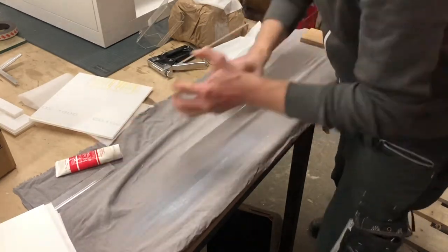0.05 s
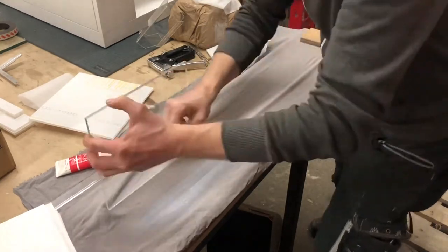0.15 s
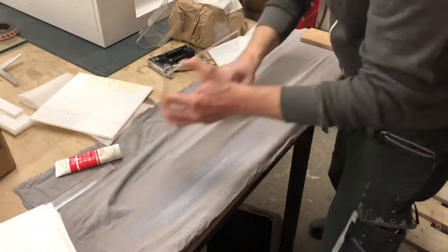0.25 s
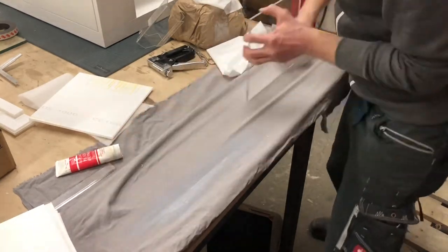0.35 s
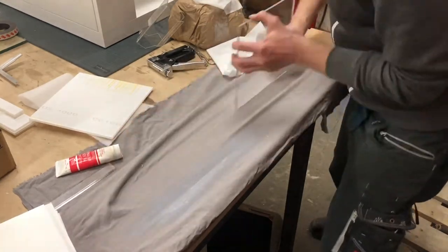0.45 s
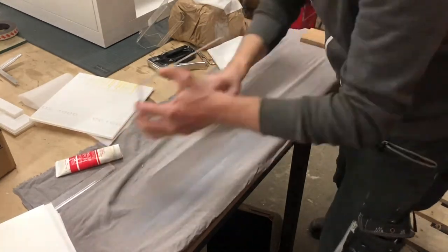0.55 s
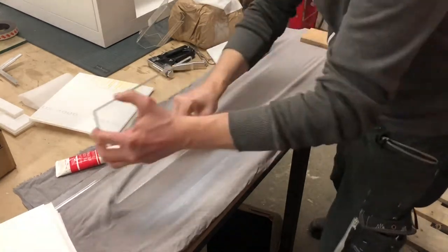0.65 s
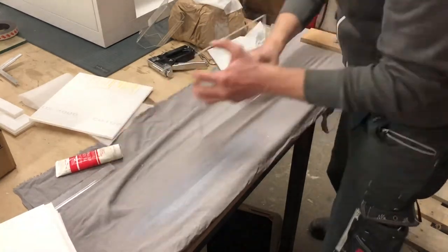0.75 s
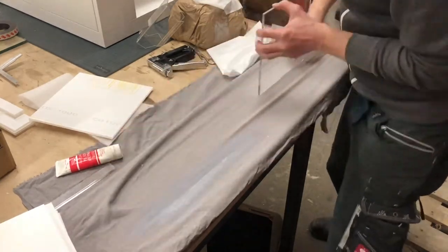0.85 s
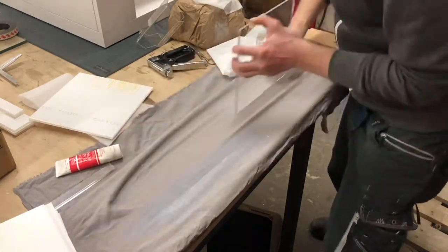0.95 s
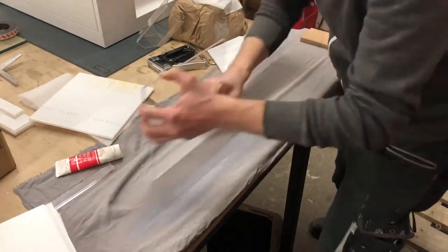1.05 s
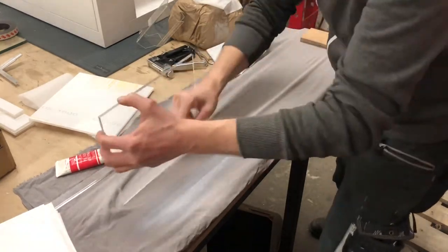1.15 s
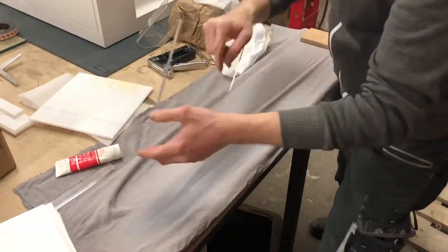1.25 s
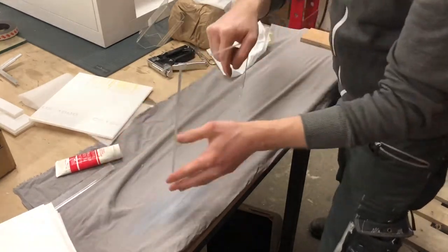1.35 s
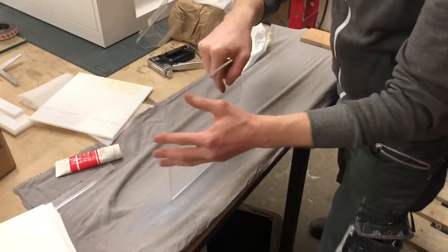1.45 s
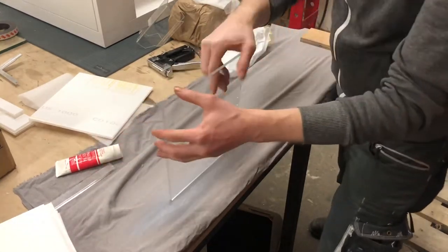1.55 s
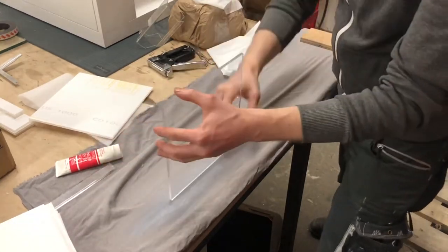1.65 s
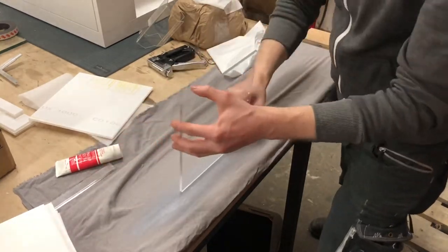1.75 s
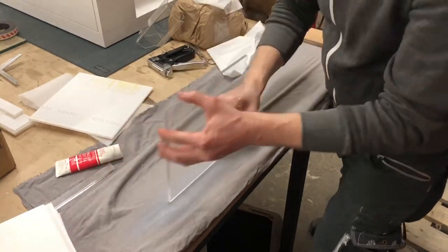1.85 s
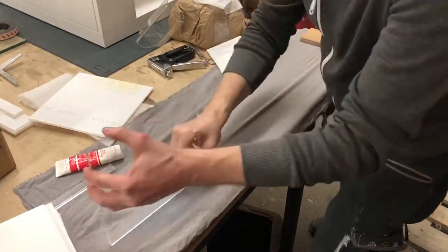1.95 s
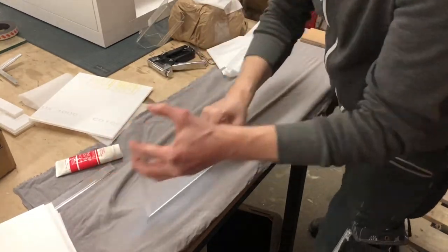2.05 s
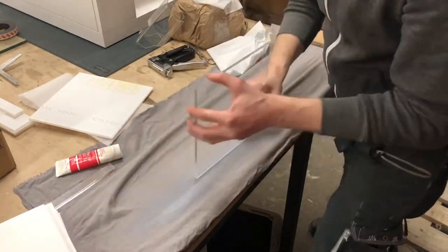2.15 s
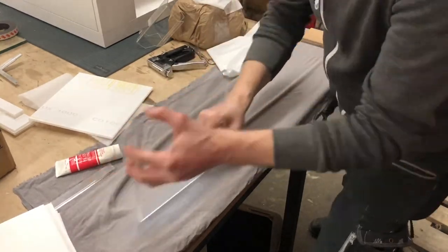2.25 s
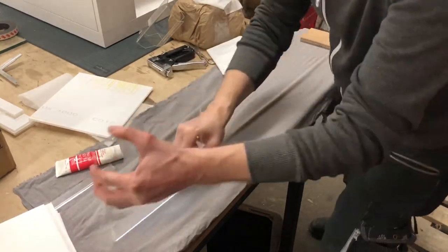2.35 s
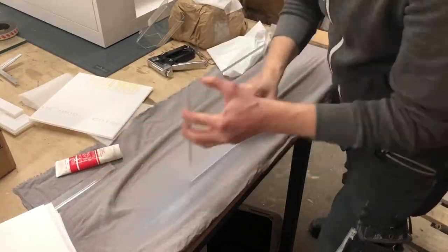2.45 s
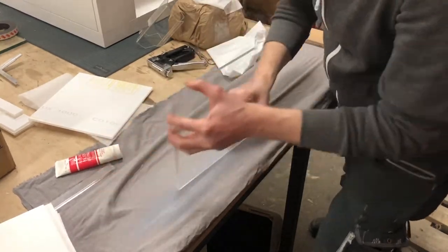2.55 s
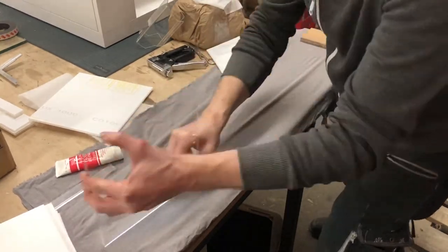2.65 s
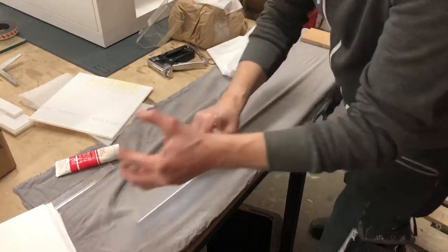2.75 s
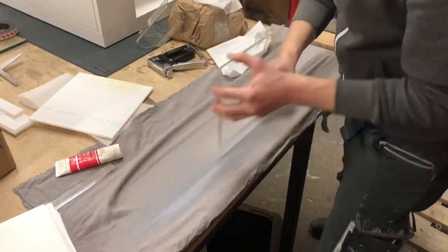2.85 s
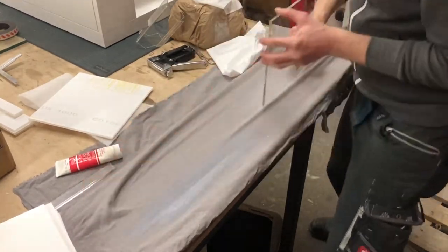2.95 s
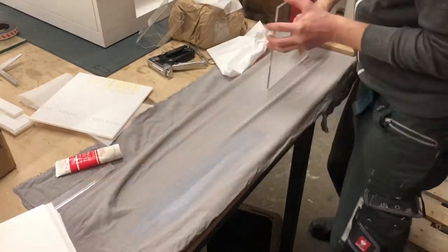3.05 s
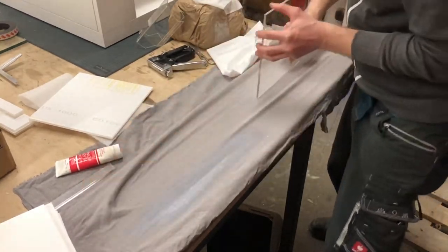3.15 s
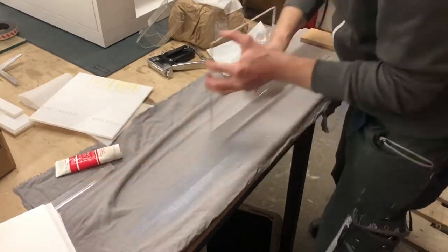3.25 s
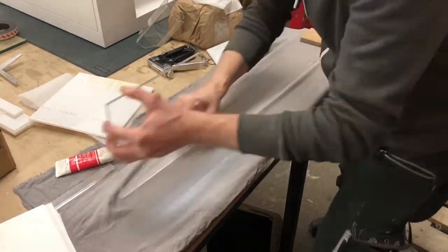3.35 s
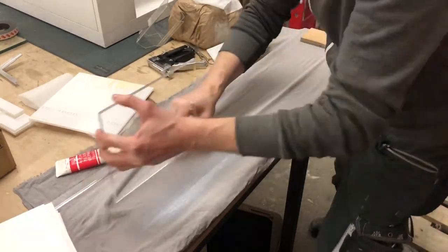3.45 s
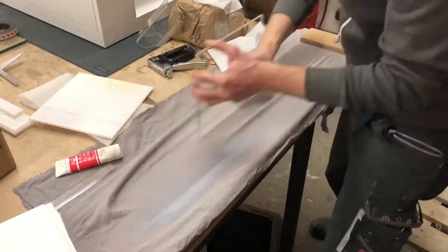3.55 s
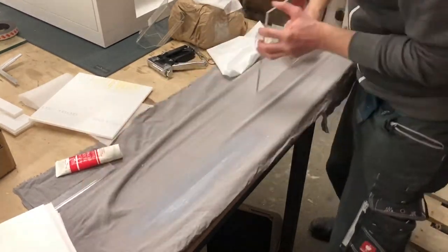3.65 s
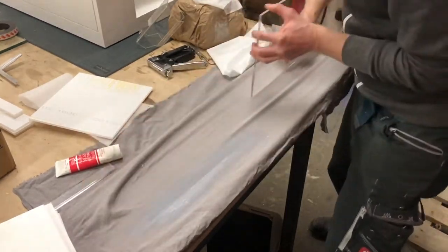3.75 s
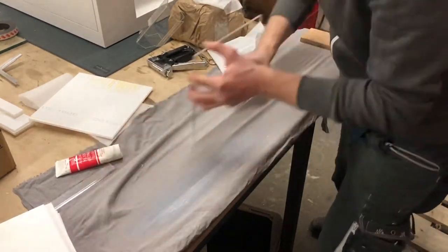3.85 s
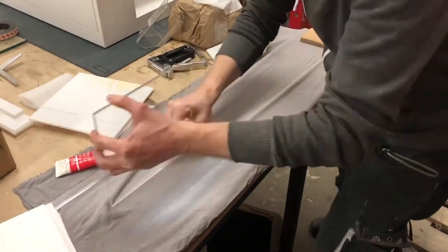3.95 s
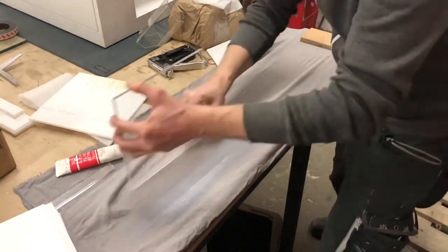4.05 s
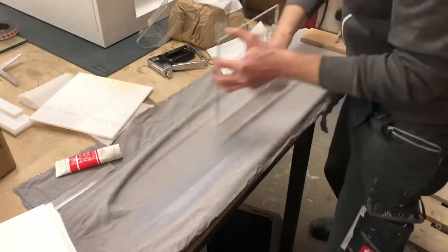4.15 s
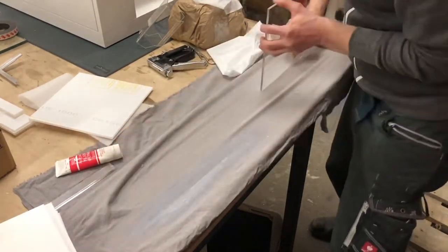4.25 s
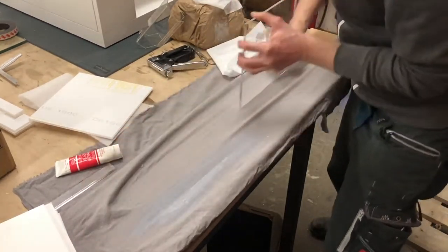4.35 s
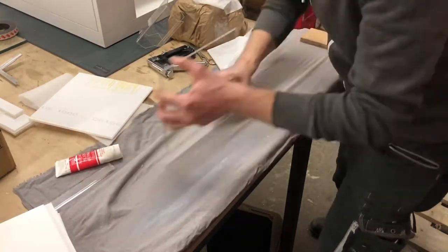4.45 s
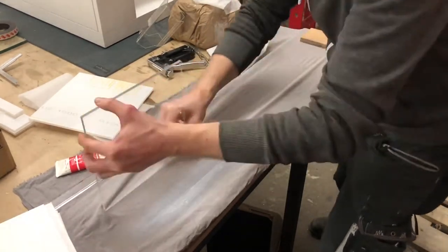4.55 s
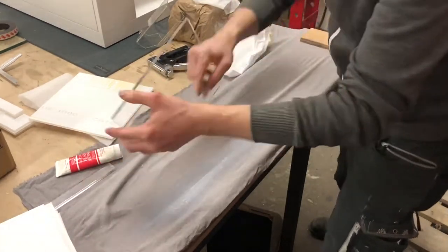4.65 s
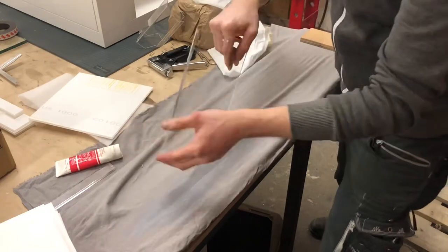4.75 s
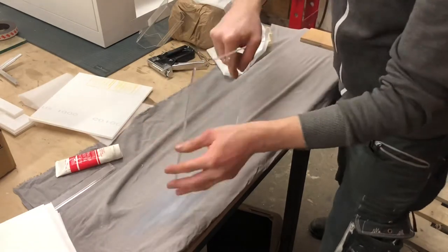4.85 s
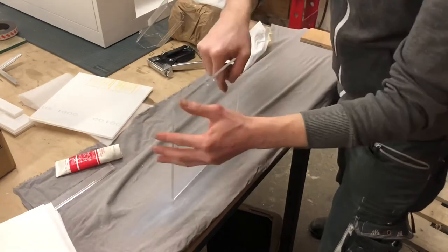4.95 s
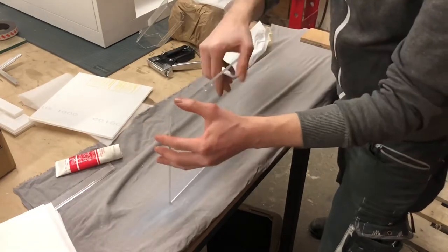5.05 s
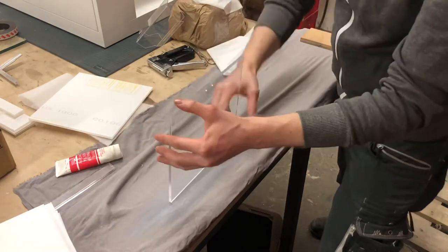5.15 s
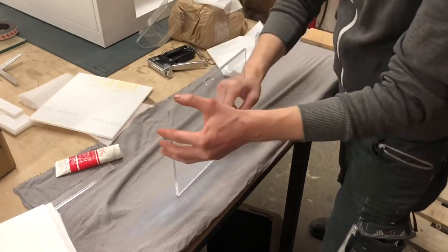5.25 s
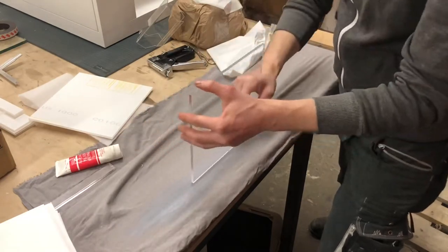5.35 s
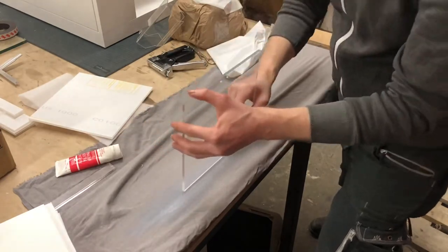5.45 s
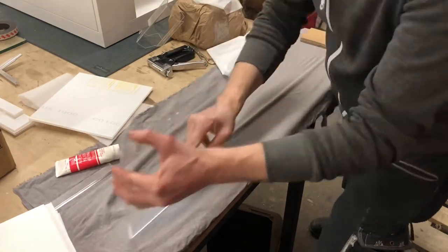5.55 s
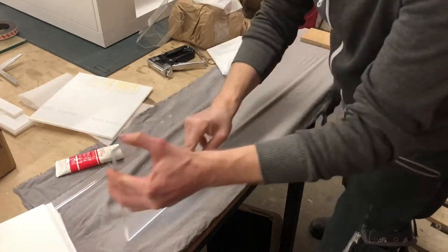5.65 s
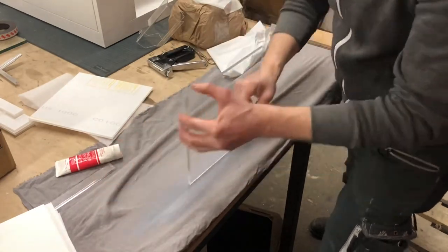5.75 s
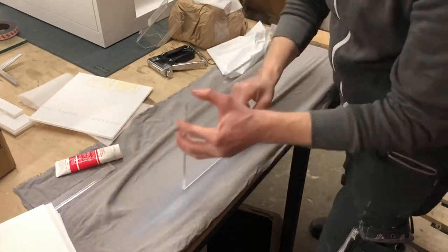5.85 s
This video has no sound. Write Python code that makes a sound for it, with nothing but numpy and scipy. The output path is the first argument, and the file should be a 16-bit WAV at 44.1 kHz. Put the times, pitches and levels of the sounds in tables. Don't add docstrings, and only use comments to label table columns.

```python
import sys
import numpy as np
from scipy import signal
from scipy.fft import rfft, irfft, next_fast_len
from scipy.io import wavfile
from scipy.ndimage import uniform_filter1d, map_coordinates

SR = 44100
rng = np.random.default_rng(int(sys.argv[2]) if len(sys.argv) > 2 else 0)


def transcribe(u):
    v = np.clip(np.atleast_2d(u).T, -1, 1)
    q = np.round(v * 32767).astype(np.int16)
    wavfile.write(sys.argv[1], SR, q)


def volts_from_db(level):
    exponent = np.asarray(level, float) / 20
    return 10 ** exponent


N = 260631
PAUSE_S = .006

# fastest moment in seconds, threads per second in Hz,
# level of the coarse lines in dB over the rasp, level of the fine lines in dB over the hiss.
LONG_STROKES = [
    (.012, 2535, 3, -18),
    (.227, 2524, 2, -12),
    (.475, 2533, 0, -9),
    (.695, 2499, -1, -13),
    (.954, 2362, 3, -11),
]
SHORT_STROKES = [
    (1.845, 2020, 0, -13),
    (2.017, 2526, -9, -9),
    (2.2, 2546, -2, -12),
    (2.542, 2511, -7, -14),
    (2.766, 2035, -8, -22),
    (5.475, 1960, 2, -2),
    (5.841, 2070, -1, -9),
]
TILTED_STROKES = [
    (2.359, 2368, -1, -18),
    (5.656, 2310, -1, -3),
]
FAR_STROKES = [
    (3.241, 2225, -5, -16),
    (3.5, 2370, -5, -14),
    (3.813, 2210, -5, -13),
    (4.065, 2380, -6, -15),
    (4.386, 2241, -5, -19),
    (4.57, 1200, -12, -25),
]
# frequency in Hz, width in Hz, level in dB.
RASP_MODES = [(940, 58, 2), (1269, 51, 6), (1452, 39, -0.5), (1513, 70, -1), (1668, 58, 4), (1814, 77, 0),
              (2005, 91, 4.5), (2270, 150, -4), (2450, 140, -4.5), (2733, 135, -5.5), (3100, 190, -7.5),
              (3630, 220, -10), (4440, 900, -18)]
# frequency in Hz, density in dB per Hz.
HISS_COLOUR = [(1470, -12), (2500, -4.5), (2800, -8.5), (3520, -6.5), (3980, -12), (4330, -9), (6010, -13),
               (7280, -6), (8880, -7.5), (9730, -7.5), (13000, -7.5), (15500, -16)]


def unit(x):
    return x / np.sqrt(np.mean(x ** 2) + 1e-20)


def along(points, hz):
    f, v = np.transpose(points)
    return np.interp(np.log(hz + 1), np.log(f + 1), v)


def wobble(rate, count):
    knots = rng.standard_normal(int(count * rate / SR) + 4)
    return map_coordinates(knots, [np.arange(count) * rate / SR])


def read(rows):
    s, *cols = np.transpose(rows)
    return [np.interp(np.arange(N) / SR, s, c) for c in cols]


def filtered(x, response):
    m = next_fast_len(len(x) + 8192)
    return irfft(rfft(x, m) * response(np.fft.rfftfreq(m, 1 / SR)), m)[:len(x)]


def resonances(peaks):
    return lambda f: sum((-1) ** k * volts_from_db(db) * 1j * f * w / (c * c - f * f + 1j * f * w)
                         for k, (c, w, db) in enumerate(peaks))


def stroke(middle):
    # moment the hand turns round, lands or lifts, in seconds.
    turns = [-.093, .095, .328, .565, .812, 1.075, 1.737, 1.92, 2.09, 2.262, 2.435, 2.625, 2.85, 3.06,
             3.348, 3.615, 3.93, 4.21, 4.503, 4.62, 5.345, 5.556, 5.745, 6.0]
    k = np.searchsorted(turns, middle)
    return turns[k - 1] + PAUSE_S, turns[k] - PAUSE_S


def speed(start, fastest, end):
    t = np.arange(start, end, 1 / SR)
    rising = (fastest - t) / (fastest - start)
    falling = (t - fastest) / (end - fastest)
    return abs(np.cos(np.pi / 2 * np.where(t < fastest, rising, falling)))


def pressure():
    # hardest moment in seconds, hiss in dB, rasp in dB, rasp change from start to end in dB, peakedness.
    efforts = [(0.015, -50.8, -50.3, 22, 2.1), (0.254, -57.8, -59.4, -15, 0.7),
               (0.493, -54.3, -50.1, 13, 1.5), (0.616, -57.7, -53.4, -17, 0.1),
               (1.019, -53.3, -54.8, 10, 0.9), (1.854, -58.9, -58.7, -1, 0.5),
               (1.935, -58.4, -51.8, -1, 0.5), (2.153, -59.6, -55.9, 18, 1.3),
               (2.313, -62.2, -54.2, 2, 0.5), (2.504, -57.4, -49.8, 13, 2.3),
               (2.796, -58.2, -61.2, -24, 0.9), (3.231, -51.4, -50.2, 18, 1.7),
               (3.435, -60.9, -55.1, -9, 0.9), (3.858, -56.6, -51.8, 7, 2.1),
               (3.963, -58.9, -50.6, -21, 1.5), (4.417, -49.2, -51.8, 14, 3.5),
               (4.584, -64.6, -68.6, -22, 0.3), (5.426, -61.0, -54.7, 16, 0.7),
               (5.571, -63.7, -56.2, 9, 0.5), (5.849, -65.8, -52.4, 6, 0.7)]
    lifted_db = -85
    hiss_rest, rasp_rest = .15, .3
    rasp_follows = .8
    levels = np.full((2, N + 2 * SR), volts_from_db(lifted_db))
    for hardest, hiss_db, rasp_db, lean_db, peaked in efforts:
        start, end = np.add(stroke(hardest), [-PAUSE_S, PAUSE_S])
        v = speed(start, hardest, end)
        way = (np.arange(len(v)) / SR + start - hardest) / (end - start)
        hiss = volts_from_db(hiss_db) * (hiss_rest + (1 - hiss_rest) * v ** peaked)
        rasp = volts_from_db(rasp_db + lean_db * way) * (rasp_rest + (1 - rasp_rest) * v ** (rasp_follows * peaked))
        levels[:, round((start + 1) * SR):][:, :len(v)] = hiss, rasp
    smooth = abs(uniform_filter1d(levels, size=600, axis=1))
    return 20 * np.log10(smooth[:, SR:SR + N])


def threads(strokes, lines, hiss_db, rasp_db):
    coarse, fine = np.zeros((2, N + 2 * SR))
    for fastest, hz, coarse_db, fine_db in strokes:
        start, end = stroke(fastest)
        v = speed(start, fastest, end)
        count, first = len(v), round((start + 1) * SR)
        crossed = 2 * np.pi * np.cumsum(v * hz) / SR
        for k, db in lines:
            is_coarse = k < 2.5
            uneven = (.85 if is_coarse else .8) * wobble(300, count=count)
            flutter_db = 3 * wobble(110, count=count) + 1.2 * wobble(25, count=count)
            line = volts_from_db(db + flutter_db) * np.sin(k * crossed + uneven)
            layer, level_db = (coarse, coarse_db) if is_coarse else (fine, fine_db)
            layer[first:][:count] += volts_from_db(level_db) * v ** 1.8 * line
        blur = unit(wobble(1100, count=count)) * np.sin(.72 * crossed)
        coarse[first:][:count] += volts_from_db(-8) * v * blur
    voiced = filtered(coarse[SR:SR + N], lambda hz: .6 + abs(resonances(RASP_MODES)(hz)))
    heard = filtered(fine[SR:SR + N], lambda hz: 1 - .5 / (1 + ((hz - 5800) / 900) ** 2))
    return volts_from_db(rasp_db - 2.5) * voiced + volts_from_db(hiss_db + 1.5) * heard


def fibres(grit_db):
    catches_db = grit_db * wobble(900, count=N) + grit_db * wobble(60, count=N)
    return rng.standard_normal(N) * volts_from_db(catches_db)


def patchy(x, patchy_db):
    z = signal.stft(x, nperseg=512)[2]
    field = uniform_filter1d(rng.standard_normal(z.shape), size=9, axis=0)
    field = uniform_filter1d(field, size=9, axis=1)
    return signal.istft(z * volts_from_db(patchy_db * unit(field)), nperseg=512)[1][:N]


def hand_motion():
    moving = np.zeros(N + 2 * SR)
    for fastest, *_ in LONG_STROKES + SHORT_STROKES + TILTED_STROKES + FAR_STROKES:
        start, end = stroke(fastest)
        v = speed(start, fastest, end)
        moving[round((start + 1) * SR):][:len(v)] = v
    return abs(uniform_filter1d(moving[SR:SR + N], size=900))


def rubbing(hiss_db, rasp_db):
    # frequency in Hz, width in Hz, level in dB.
    edge_modes = [(3520, 870, -1.5), (5130, 1100, -3), (7770, 1660, -4), (9340, 1700, -1.5),
                  (11640, 1100, -0.5), (13200, 1040, 1), (15600, 1500, 5.5)]
    # frequency in Hz, width in Hz, level in dB.
    drone_modes = [(135.5, 32, -8.5), (208, 30, 3), (329.4, 110, -6), (507, 75, -4), (710, 245, -8)]
    # time in seconds, level in dB.
    leaning = [(0.0, -69), (1.76, -70), (2.62, -58), (2.9, -69), (3.45, -55), (3.7, -63), (3.95, -61),
               (4.2, -74), (4.4, -67), (4.76, -73), (5.2, -66), (5.91, -70)]
    moving = hand_motion()

    def sheen(hz):
        return volts_from_db(along(HISS_COLOUR, hz)) * (1.2 + abs(resonances(edge_modes)(hz)))

    def sheet(hz):
        return resonances(RASP_MODES)(hz) * hz ** 2 / (hz ** 2 + 700 ** 2)

    hiss = unit(filtered(patchy(fibres(grit_db=1.25), patchy_db=2.1), sheen))
    rasp = unit(filtered(patchy(fibres(grit_db=1.8), patchy_db=2.8), sheet))
    dull = filtered(rasp, lambda hz: 1 / (1 + (hz / 1700) ** 4))
    rasp = dull + moving ** 0.5 * (rasp - dull)
    drone = unit(filtered(fibres(grit_db=3.0), resonances(drone_modes)))
    rubbed = volts_from_db(hiss_db) * moving ** .2 * hiss + volts_from_db(rasp_db - 5) * moving ** .15 * rasp
    return rubbed + volts_from_db(read(leaning)[0] + 1) * drone


def ring(modes, t, rise):
    total = 0
    for (hz, db, t60), (a, b, c) in zip(modes, rng.standard_normal((len(modes), 3))):
        swell = volts_from_db(db + 3.86 * a - 60 * t / t60) * (1 - np.exp(-t * hz / rise))
        total = total + swell * np.sin(2 * np.pi * hz * (1 + 0.021 * b) * t + c)
    return total


def tail(decays, count):
    hz, t, z = signal.stft(rng.standard_normal(count), SR, nperseg=256)
    dying = volts_from_db(-60 * t / along(decays, hz)[:, None])
    x = signal.istft(z * dying, SR, nperseg=256)[1]
    return x / np.linalg.norm(x)


def knocks():
    # time in seconds, peak in dB, sheet ring in dB, click in dB.
    contacts = [(0.09, -41.5, -12.5, -18), (0.327, -49, -11, -15), (0.563, -39, -17, -20),
                (0.809, -51.5, -12.5, -10), (1.111, -52, -7, -5), (1.356, -40, -36, -23),
                (1.413, -31, -6, -28), (1.916, -48, -22, -25), (2.086, -47, -12.5, -26),
                (2.261, -42.5, -12, -24), (2.432, -46, -10.5, -29), (2.623, -42, -16, -15),
                (2.877, -52.5, -17, -20), (3.011, -32, -24, -37), (3.342, -41, -11, -15),
                (3.584, -53, -13, -19), (3.931, -41.5, -22, -20), (4.198, -47.5, -19.5, -24),
                (4.909, -27.5, -2, -18.5), (5.108, -54, -30, -25), (4.732, -55, -14, -25),
                (5.215, -57, -14, -25), (5.267, -26, -4.5, -17), (5.542, -45, -10.5, -18),
                (3.632, -50, -20, -25), (5.781, -52, -8, -20)]
    # frequency in Hz, level in dB, 60 dB decay in seconds.
    bench_modes = [(138.6, -11.5, 0.081), (207, 4, .2), (296.6, -4.5, 0.16), (426.6, -12, 0.25),
                   (529.7, -0.5, 0.13), (672.4, -5.5, 0.064), (814.5, -10.5, 0.13)]
    sheet_modes = [(931, 9.5, 0.061), (1263, 12, 0.054), (1404, -1, 0.09), (1514, -10, 0.11),
                   (1840, 3.5, 0.04), (2087, 2.5, 0.041), (2443, -25, 0.027)]
    # frequency in Hz, width in Hz, level in dB.
    click_modes = [(2970, 580, 9), (5200, 1200, -1), (8400, 1000, -2.5), (13000, 3000, -13)]
    # frequency in Hz, density in dB per Hz.
    thud_colour = [(53, -48), (90, -16), (192, -4), (319, -6), (367, -10.5), (560, -4), (915, 0.5),
                   (1110, -13), (1230, -4), (1850, -4), (6000, -36), (7800, -81), (13200, -120)]
    # frequency in Hz, 60 dB decay in seconds.
    thud_decay = [(150, 0.34), (500, 0.21), (1500, 0.2), (3000, 0.08), (6000, 0.018)]
    shop_decay = [(150, 0.2), (1000, 0.19), (3000, 0.26), (10000, 0.08)]
    out, t = np.zeros(N + 2 * SR), np.arange(SR // 3) / SR
    for s, db, sheet_db, click_db in contacts:

        def hard(hz):
            return volts_from_db(along(thud_colour, hz) + sheet_db / (1 + (900 / (hz + 1)) ** 4))

        click = filtered(rng.standard_normal(len(t)), resonances(click_modes))
        click = click * volts_from_db(click_db + 9 - 60 * t / .025) * (1 - np.exp(-(t / .003) ** 2))
        snap = volts_from_db(sheet_db + 11.5 - 60 * t / 0.0062) * np.sin(2 * np.pi * 1650 * t)
        dense = filtered(tail(thud_decay, count=len(t))[:len(t)], hard) * (1 - np.exp(-t / 0.0013))
        board = volts_from_db(-11) * ring(bench_modes, t, rise=0.53)
        sheet = volts_from_db(sheet_db - 16) * ring(sheet_modes, t, rise=0.54)
        hit = board + sheet + volts_from_db(34.5) * dense + snap + click
        wet = signal.fftconvolve(hit, tail(shop_decay, count=SR // 2))
        out[round(s * SR):][:len(t)] += volts_from_db(db) * hit
        out[round((s + .004) * SR):][:len(wet)] += volts_from_db(db - 10.5) * wet
    return out[:N]


def slips():
    # time in seconds, peak in dB, length in seconds, low part in dB.
    scuffs = [(1.1094, -47, 0.0024, 1), (1.287, -69, .002, -9), (1.32, -67, .003, -5),
              (1.612, -63.5, 0.0067, -13), (1.636, -64.5, 0.034, -31.5), (1.67, -64, 0.026, -15),
              (2.839, -64.5, 0.007, 14), (2.88, -70, 0.0035, -3), (1.12, -64, 0.052, -22),
              (1.18, -65, .05, -27), (4.712, -57.5, .028, -12), (4.858, -63, .022, -15),
              (4.887, -79, 0.0027, -12), (5.146, -69, .008, -19)]
    skin, low = np.zeros((2, N))
    t = np.arange(SR // 8) / SR
    for s, db, length, low_db in scuffs:
        scuff = np.clip(t / (.3 * length), 0, 1) / (1 + (t / length) ** 4)
        shape = scuff + volts_from_db(-16 - 60 * t / .15)
        skin[round(s * SR):][:len(t)] += volts_from_db(db - 1.5) * shape
        low[round(s * SR):][:len(t)] += volts_from_db(db - 5 + low_db) * shape
    bright = unit(filtered(fibres(grit_db=1.6), lambda hz: volts_from_db(along(HISS_COLOUR, hz)) * hz / (hz + 7000)))
    dull = unit(filtered(fibres(grit_db=1.6), resonances([(2200, 1500, 0), (4400, 900, -1)])))
    return skin * bright + low * dull


def squeaks():
    # start in seconds, length in seconds, frequency in Hz, level in dB.
    hums = [
        (2.701, 0.086, 3050, -67),
        (3.54, 0.2, 2780, -71),
        (5.6, 0.17, 760, -58),
        (1.97, 0.13, 950, -61),
    ]
    out = np.zeros(N)
    for s, length, hz, db in hums:
        t = np.arange(0, length, 1 / SR)
        size = volts_from_db(db + 4 * wobble(87, count=len(t))) * np.sin(np.pi * t / length)
        phase = 2 * np.pi * hz * t + 1.5 * wobble(200, count=len(t))
        out[round(s * SR):][:len(t)] += size * np.sin(phase)
    return out


def workshop():
    # frequency in Hz, density in dB per Hz.
    air_colour = [(15, -74), (25, -17), (217, 2.5), (270, -12), (317, 0.5), (962, -14), (1100, -10.5),
                  (1940, -16.5), (5570, -24), (12900, -26.5), (16000, -22)]
    air = unit(filtered(rng.standard_normal(N), lambda hz: volts_from_db(along(air_colour, hz))))
    return volts_from_db(-65.5 + 0.267 * wobble(2.06, count=N)) * air


def scene():
    # multiple of the thread rate, level in dB.
    long_lines = [(1, 0), (1.5, -7), (2, -10), (3.07, 1), (4, 1), (6.1, 1)]
    short_lines = [(.5, -6), (1, 0), (4, 0), (5, -8)]
    tilted_lines = [(.5, 0), (2, -16), (4, -1)]
    far_lines = [(1, 0), (1.55, 0), (6.1, 0)]
    hiss_db, rasp_db = pressure()
    grips = [(LONG_STROKES, long_lines), (SHORT_STROKES, short_lines),
             (TILTED_STROKES, tilted_lines), (FAR_STROKES, far_lines)]
    sung = sum(threads(strokes, lines, hiss_db, rasp_db) for strokes, lines in grips)
    return (sung + rubbing(hiss_db, rasp_db) + knocks() + slips() + squeaks() + workshop())[None]


def top_cut(x):
    return signal.sosfilt(signal.butter(12, 16890, fs=SR, output="sos"), x)


def record(dry):
    heard = filtered(dry[0], lambda hz: (1j * hz / (1j * hz + 85)) ** 3 * (hz < 15785))
    return top_cut(heard[None])


dry = scene()
out = record(dry)
transcribe(out)
```